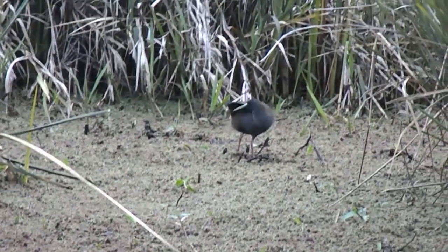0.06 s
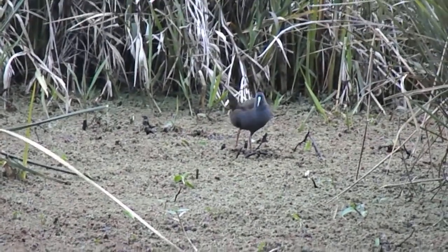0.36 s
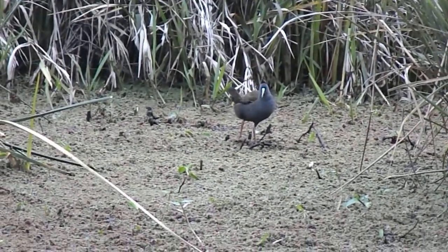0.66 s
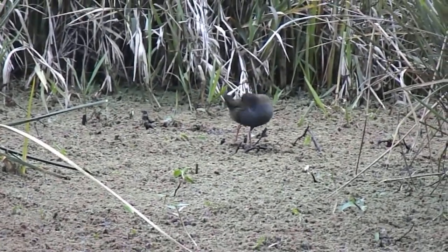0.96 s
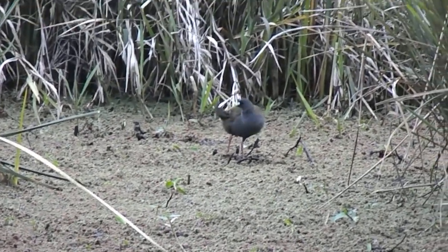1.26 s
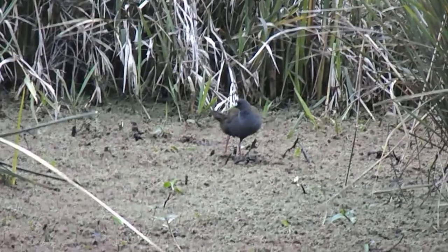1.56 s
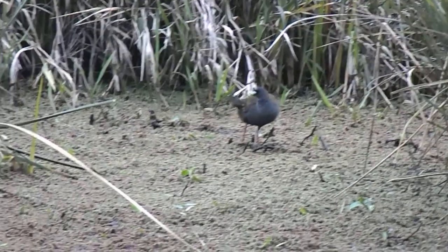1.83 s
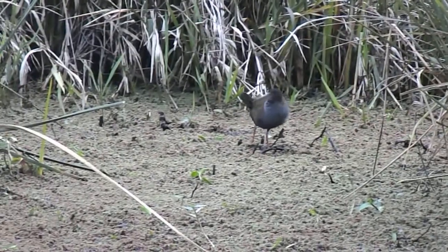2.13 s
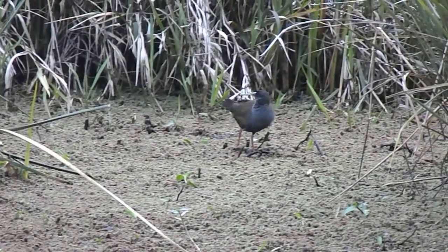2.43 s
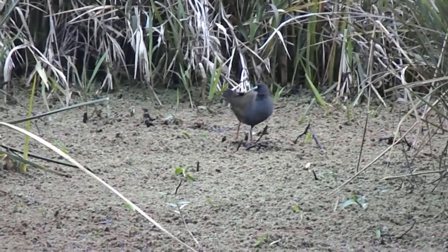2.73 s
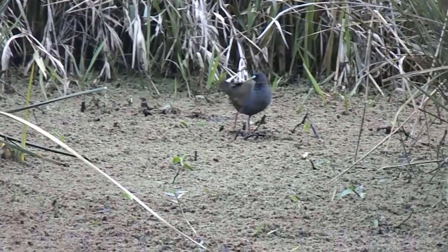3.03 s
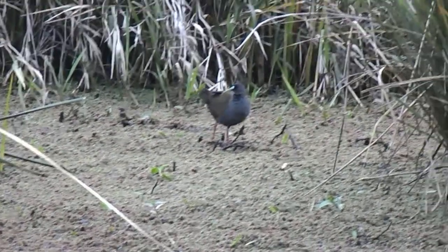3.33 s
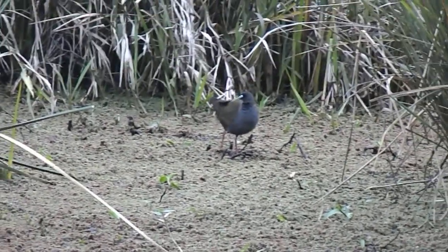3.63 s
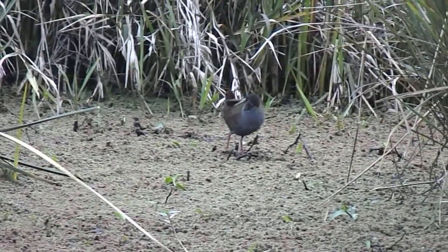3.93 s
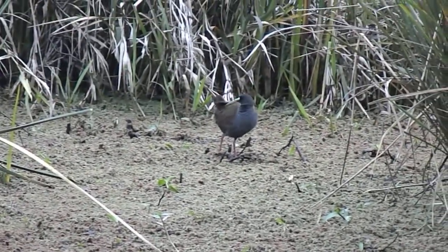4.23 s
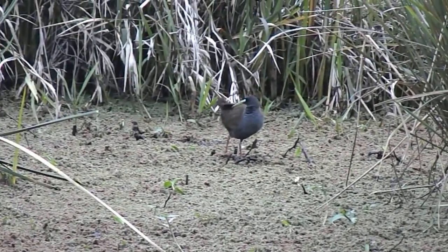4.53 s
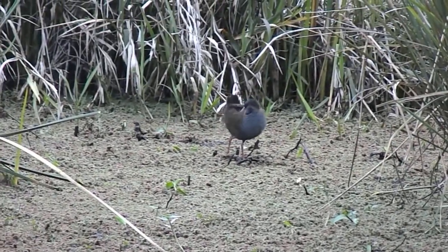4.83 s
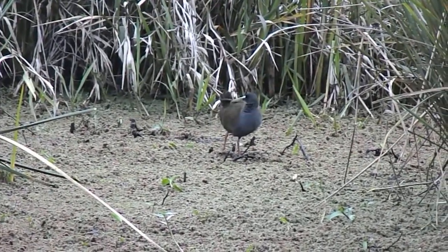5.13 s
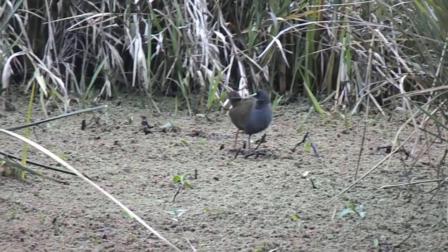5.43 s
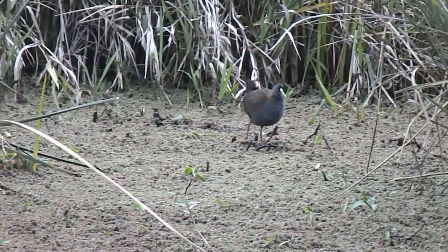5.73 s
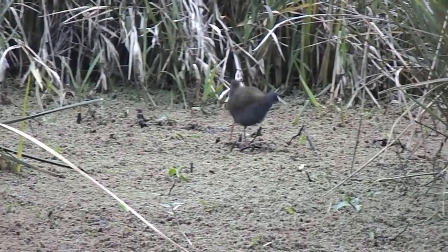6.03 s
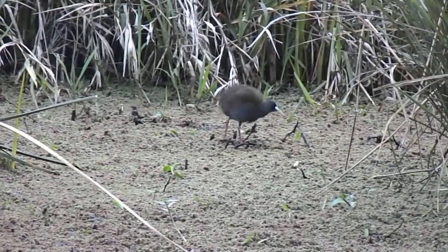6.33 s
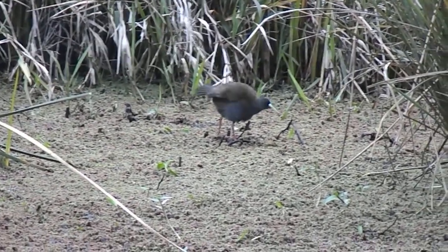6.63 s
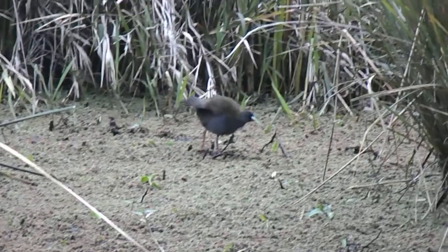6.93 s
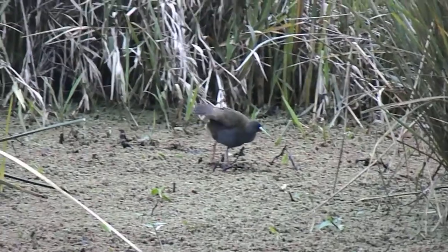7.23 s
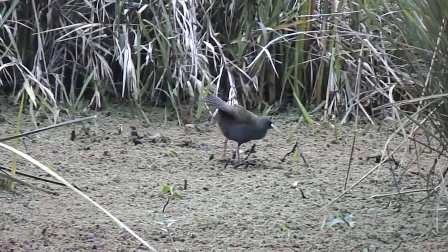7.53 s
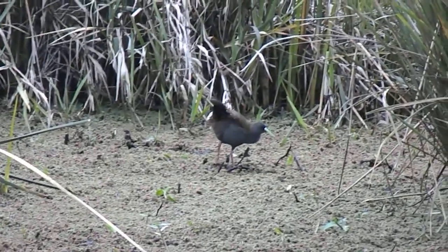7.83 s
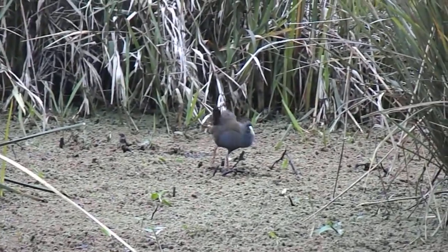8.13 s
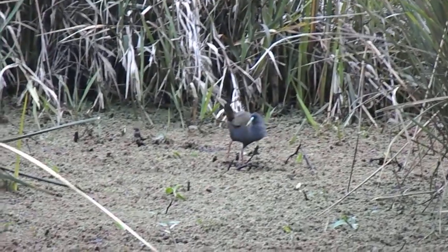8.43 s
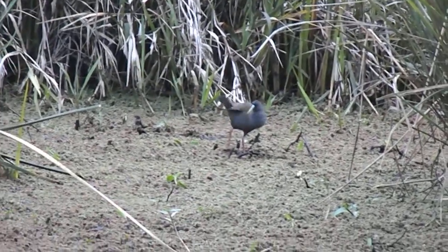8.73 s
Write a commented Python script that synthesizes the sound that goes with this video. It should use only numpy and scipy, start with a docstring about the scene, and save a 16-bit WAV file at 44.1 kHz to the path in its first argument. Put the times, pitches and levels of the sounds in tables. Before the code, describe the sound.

A marsh bird chirps again and again, high, thin and raspy, over pulsing crickets and a faint steady high whine.

```python
"""Marsh bird at the reed bed

A bird chirps again and again, drifting from left to centre: each call is a short rising rasp that
breaks into a thin falling whistle. Three crickets pulse, dry stalks scratch now and then, and fainter
birds answer, all echoing in the reeds. Under them lie a wash of open air and, mostly on the right,
a camera's soft motor hum and thin high whine."""
import sys
import numpy as np
from scipy import signal
from scipy.fft import rfft, irfft
from scipy.io import wavfile

SR = 44100
rng = np.random.default_rng(int(sys.argv[2]) if len(sys.argv) > 2 else 0)


def persist_wave(psi):
    """Save psi, clipped to +-1, as 16-bit WAV."""
    counts = np.round(np.clip(psi, -1, 1) * 32767).astype(np.int16)
    wavfile.write(sys.argv[1], SR, np.atleast_2d(counts).T)


N = 392049
TIME = np.arange(N) / SR


def amp(db):
    """Decibels to gain."""
    return 10 ** (np.asarray(db) / 20)


def unit_rms(x):
    """Scales to rms 1."""
    return x / np.sqrt(np.mean(x ** 2) + 1e-20)


def curve_at(points, hz):
    """Reads a curve on a log-frequency axis."""
    f, value = np.transpose(points)
    return np.interp(np.log(hz + 1), np.log(f + 1), value)


def add(mix, s, sound):
    """Lays a sound into the mix from time s on."""
    start = round(s * SR)
    sound = sound[..., max(-start, 0):]
    part = mix[..., max(start, 0):][..., :sound.shape[-1]]
    part += sound[..., :part.shape[-1]]


def wander(hz):
    """Smooth random modulation of rms 1, rolling off around hz."""
    f = np.fft.rfftfreq(N, 1 / SR)
    return unit_rms(irfft(rfft(rng.standard_normal(N)) * np.exp(-(f / hz) ** 2), N))


def pan(db):
    """Stereo gains that put the left db above the right."""
    return amp(np.array([[db], [-db]]) / 2)


def delayed(x, ms):
    """Delays by any fraction of a sample."""
    hz = np.fft.rfftfreq(len(x), 1 / SR)
    return irfft(rfft(x) * np.exp(-2j * np.pi * hz * ms / 1000), len(x))


def rasp(db, octave_db, hiss_db, pitch_factor, motion, length=.037, low_hz=1930, high_hz=2720):
    """The voice climbs, shaken hoarse by a second, slower vibration. Returns (offset [s], sound)."""
    rough_ratio = 720 / low_hz  # the slower vibration's rate against the voice's
    u = np.arange(0, 1, 1 / (length * SR))
    jitter, shake = motion[:, :len(u)]
    climb_hz = low_hz + (high_hz - low_hz) * np.sin(np.pi / 2 * u) ** 2
    hz = pitch_factor * climb_hz * (1 + .028 * jitter) * (1 + .04 * shake[0])
    phase = 2 * np.pi * np.cumsum(hz) / SR
    roughness = .85 * (np.sin(phase * rough_ratio) / 2 + np.tanh(2 * shake))
    body = (amp(-12) * np.sin(phase) + amp(octave_db) * np.sin(2 * phase)) * (1 + .7 * roughness)
    upper = sum(amp(h) * np.sin(k * phase + k * k) for k, h in enumerate([-7.5, -12.5, -20, -20], 3))
    swell = np.interp(u, [0, .25, .72, 1], [.15, .68, .73, .095])
    hiss = unit_rms(upper * (.5 + roughness) * swell)
    return -length, np.sqrt(2) * amp(db) * body * unit_rms(swell) + amp(hiss_db) * hiss


def whistle(length, top_hz, end_hz, hold, level_db, overtone_db, motion):
    """A near sine flicks up, holds and sags, coloured by throat and beak. Returns (offset [s], sound)."""
    # what the throat passes of the whistle: (pitch [Hz], gain [dB])
    throat = [(3000, -0.5), (3500, -1), (4000, 2.15), (4500, -0.1), (5000, -4.5), (5500, -9), (6000, -7.5),
              (6600, -1.5)]
    # what the beak passes of the overtones: (frequency [Hz], gain [dB])
    beak = [(6200, 2.5), (7200, 0.5), (9000, -1), (10200, -10.5), (12000, -8), (13500, -19), (16000, -23)]
    flick_s, flick_depth, knee, release_s = .006, .2246, .041, .011
    t = np.arange(-flick_s, length + release_s / 2, 1 / SR)
    u = np.clip(t / length, 0, 1)
    drift, flutter = motion[:, :len(t)]
    sag = np.clip(knee * np.logaddexp(0, (u - hold) / knee) / (1 - hold), 0, 1)
    hz = end_hz + (top_hz - end_hz) * (1 - sag) ** 2.05  # falls ever more slowly
    hz *= (1 - flick_depth * (np.minimum(t, 0) / flick_s) ** 2) * (1 + .01014 * drift)
    phase = 2 * np.pi * np.cumsum(hz) / SR
    overtones = sum(amp(overtone_db + db + curve_at(beak, k * hz)) * np.sin(k * phase)
                    for k, db in enumerate([0, -4, -1], 2))
    fades = np.clip((t + flick_s) / flick_s, 0, 1) * np.clip((t[-1] - t) / release_s, 0, 1)
    envelope = np.sqrt(2) * fades * amp(level_db + .2 * u - 4 * u ** 4 + 1.5 * flutter)
    return -flick_s, envelope * amp(curve_at(throat, hz)) * (np.sin(phase) + overtones)


def near_bird(usual_db=-38, usual_end_hz=3347):
    """The lead voice: rasp, then whistle, each call from the spot the bird has reached."""
    # calls: (whistle start [s], length [s], top pitch [Hz], end pitch [Hz], hold [share of length],
    # level before the throat [dB], overtones before the beak [relative dB], base rasp hiss [dB])
    calls = [(0.0, 0.052, 5350, 3370, 0.0007, -44, -14.5, -64),
             (0.189, 0.1, 6800, 3410, 0.17, -50.5, -6, -67),
             (0.288, 0.062, 5480, 3480.0, 0.071, -38.5, -15.5, -61),
             (0.508, 0.07, 5310, 3280.0, 0, -41.5, -16.5, -66),
             (0.787, 0.073, 6060.0, 3340, 0.1, -42, -14, -51.5),
             (1.211, 0.09, 6620, 3600.0, 0.17, -46.0, -8, -61),
             (1.538, 0.065, 5550, 3440, 0.038, -37, -9.5, -48),
             (1.71, 0.07, 5050, 3380, 0.071, -44, -12, -51),
             (1.776, 0.072, 5720, 3350, 0.016, -39.0, -13, -50.5),
             (1.994, 0.069, 5080, 3424, 0.01, -42.5, -14, -51),
             (2.083, 0.088, 6680, 3390, 0.18, -41.5, -9, -54),
             (2.375, 0.078, 3800.0, 3370.0, 0.03, -66, -22.0, -75),
             (2.617, 0.069, 6440.0, 3490, 0.065, -38.5, -6.5, -44.5),
             (2.876, 0.089, 6700, 3445, 0.21, -43, -6.5, -57),
             (2.987, 0.064, 5530, 3370, 0.073, -38.5, -11.5, -56),
             (3.229, 0.058, 5400, 3314, 0.03, -38.5, -14.5, -55),
             (3.548, 0.098, 6610, 3510, 0.1, -40.5, -8, -58.5),
             (3.621, 0.077, 6430, 3380, 0.12, -40.5, -15.0, -54),
             (4.164, 0.086, 6440.0, 3195, 0.22, -41.0, -8.5, -57),
             (4.223, 0.079, 5170, 3190, 0.02, -45.0, -13.0, -60),
             (4.317, 0.061, 5720, 3365, 0.077, -39, -17, -52.5),
             (4.665, 0.07, 5220, 3385, 0.078, -38.5, -13.0, -53.5),
             (4.897, 0.094, 6450.0, 3300.0, 0.11, -41, -11.0, -56.5),
             (5.027, 0.073, 4740, 3080, 0.11, -42, -18, -53),
             (5.292, 0.063, 5250, 3310.0, 0.02, -39.0, -9.5, -50.5),
             (5.324, 0.074, 5700.0, 3350.0, 0.0031, -43.5, -19.0, -57),
             (5.47, 0.095, 6350, 3390, 0.034, -44.5, -14, -68),
             (5.835, 0.081, 5950.0, 3284, 0.16, -40.5, -14.0, -52.5),
             (6.328, 0.079, 4740, 3195, 0.098, -46, -13.5, -63),
             (7.06, 0.084, 4690.0, 3245, 0.051, -45.0, -19, -58),
             (7.179, 0.063, 4910, 3200, 0.047, -46, -17.0, -62),
             (7.304, 0.058, 5760, 3460.0, 0.019, -55.5, -9, -67),
             (7.338, 0.09, 5400.0, 3290, 0.051, -51, -17, -60),
             (7.489, 0.045, 5840, 3460, 0.0078, -58, -15, -66),
             (7.583, 0.1, 6260, 3190, 0.21, -50, -13.0, -65),
             (8.006, 0.073, 5120, 3246, 0.0, -50.5, -15, -74),
             (8.224, 0.09, 4690, 3090, 0.13, -49, -17, -57.5),
             (8.505, 0.086, 6360, 3440, 0.041, -45.5, -18.0, -59),
             (8.641, 0.059, 4330, 3150, 0.13, -54, -18, -74),
             (8.677, 0.11, 6560, 3184, 0.073, -49.5, -16, -70)]
    # the bird's path: (time [s], right channel's lag [ms], left over right [dB])
    path = [(0, 0.11, 7), (2, 0.1, 5.5), (4.2, 0.082, 6), (5.4, 0.059, 4), (6.2, 0.031, 8.5),
            (8.6, -0.027, 1.5)]
    times, lags, sides = np.transpose(path)
    out = np.zeros((2, N))
    slow, fast = np.array([wander(170), wander(130)]), np.array([wander(1100), wander(986)])
    for call, detune in zip(calls, rng.standard_normal(len(calls))):
        s, length, top_hz, end_hz, hold, level_db, overtone_db, hiss_db = call
        at = int(s * SR / 2)  # where this call picks up the modulation
        lag_ms, gains = np.interp(s, times, lags), pan(np.interp(s, times, sides))
        rasp_db = -44.5 + .7 * (level_db - usual_db)  # louder calls rasp harder
        # the rasp's octave weakens before a high whistle: (top pitch [Hz], gain [dB])
        rasp_octave = [(5700, 0), (6400, -7)]
        pitch_factor = end_hz / usual_end_hz + .0299 * detune
        onset = rasp(rasp_db, curve_at(rasp_octave, top_hz), hiss_db + .7, pitch_factor, fast[:, at:])
        tone = whistle(length, top_hz, end_hz, hold, level_db, overtone_db, slow[:, at:])
        for offset, sound in (onset, tone):
            add(out, s + offset, gains * np.array([sound, delayed(sound, lag_ms)]))
    return out


def crickets(third_per_s=12.15):
    """Each wing stroke is a tone that sags; two crickets take turns, a third keeps a faster beat."""
    # the leading cricket's beat: (time [s], running count [strokes])
    stroke_counts = [(0, -.42), (1, 9.8), (2, 20.16), (4, 40.74), (5, 51.0), (6, 61.22), (7, 71.63),
                     (8.9, 91.2)]
    # crickets: (pitch [Hz], fall [Hz], stroke [share of beat], level [dB], second partial [dB],
    # third partial [dB], left over right [dB], late level change [dB])
    voices = [(3780, 170, .56, -55.5, -4, -7, -1, -2), (3925, 170, .5, -52.8, -21, -22, 0, -9),
              (4540, 110, .5, -65, -22, -28, 2, 0)]
    # the span over which the pair quietens: (start [s], end [s])
    quieten_s = [6.57, 7.7]
    lead_beat = np.interp(TIME, *np.transpose(stroke_counts))
    beats = lead_beat, lead_beat - .55, (TIME - 6.48) * third_per_s
    late = np.interp(TIME, quieten_s, [0, 1])
    out = np.zeros((2, N))
    for (hz, fall_hz, share, db, second_db, third_db, side_db, late_db), beat in zip(voices, beats):
        u = np.clip(((beat + .5) % 1 - .5) / share + .5, 0, 1)  # progress through the stroke
        arch = np.sin(np.pi * u)
        phase = 2 * np.pi * np.cumsum(hz - fall_hz * u ** 2 + 10 * wander(38.6)) / SR
        stroke = arch * amp(db + late_db * late + 1.5 * wander(4.5))
        overtones = amp(second_db) * np.sin(2 * phase) + amp(third_db) * np.sin(3 * phase)
        out += np.sqrt(2) * stroke * (pan(side_db) * np.sin(phase) + pan(2.6) * arch * overtones)
    return np.array([out[0], delayed(out[1], .035)])


def marsh_air(swell_db=.61):
    """A wide, gently breathing bed of noise, its treble a little to the left."""
    # open air with a far insect chorus near 4 kHz: (frequency [Hz], density [dB per Hz])
    spectrum = [(20, -122), (65, -140), (120, -120), (200, -107), (330, -95.5), (550, -94), (2700, -93),
                (3400, -86.5), (3850, -81.5), (4500, -90), (5200, -96.5), (8200, -97), (12500, -102.5),
                (15700, -103.5)]
    # how alike the air is on both sides: (frequency [Hz], correlation [-1 to 1])
    correlation = [(100, -0.11), (600, 0.11), (1500, 0.12), (3500, -0.52), (7000, -0.13), (12000, 0.0091)]
    hz = np.fft.rfftfreq(N, 1 / SR)
    left, other = rfft(rng.standard_normal((2, N)))
    same = curve_at(correlation, hz)
    right = same * left + np.sqrt(1 - same ** 2) * other
    side_db = curve_at([(300, -2.5), (2500, .5), (4500, 2.5), (8000, .5)], hz)
    stereo = np.array([left * amp(side_db / 2), right * amp(-side_db / 2)])
    wash = irfft(stereo * amp(curve_at(spectrum, hz)), N) * np.sqrt(SR / 2)
    return wash * amp(swell_db * wander(1.0))


def camera_motor(whine_hz=11721, low_cut_hz=330):
    """Motor noise through the housing's resonances, and a thin electronic whine."""
    # resonances of the housing: (centre [Hz], width [Hz], peak density [dB per Hz])
    housing = [(420, 150, -99), (630, 325, -92.5), (945.5, 83.5, -79.5), (1101, 88, -86), (1282, 104, -87),
               (1555, 360, -93), (1818, 120, -85.5), (10500, 880, -100)]
    hz = np.fft.rfftfreq(N, 1 / SR)
    power = sum(amp(db) ** 2 / (1 + ((hz - f) / width) ** 2 * 2) ** 2 for f, width, db in housing)
    power *= 1 - np.exp(-(hz / low_cut_hz) ** 6)
    hum = irfft(rfft(rng.standard_normal(N)) * np.sqrt(power * SR / 2), N)
    whine = np.sqrt(2) * np.sin(2 * np.pi * whine_hz * TIME)
    return amp([[-13], [0]]) * hum + amp([[-83], [-71.5]]) * whine


def reed_echo(send, early_db=10, early_t60=.075, echoes_per_s=3000):
    """Stalks scatter the sound: a quick cluster of echoes and a longer faint tail."""
    # decay of the tail: (frequency [Hz], t60 [s])
    tail_t60 = [(2000, 0.17), (4000, 0.24), (8000, 0.58), (14000, 0.092)]
    taps = rng.standard_normal((2, SR // 2)) * (rng.random((2, SR // 2)) < echoes_per_s / SR)
    taps[:, :int(.002 * SR)] = 0  # pre-delay
    hz, t, bands = signal.stft(taps, SR, nperseg=256)
    decay = amp(-60 * t / curve_at(tail_t60, hz)[:, None]) + amp(early_db - 60 * t / early_t60)
    impulse = signal.istft(bands * decay, SR, nperseg=256)[1]
    impulse /= np.linalg.norm(impulse, axis=1, keepdims=True)
    return signal.fftconvolve(send, impulse, axes=1)[:, :N]


def stalk_scratches(width_octaves=.48, graininess=.76):
    """Dry stalks scratch on the left in short grainy bursts of noise."""
    # scratches: (time [s], length [s], centre [Hz], level [dB])
    bursts = [(0.418, 0.028, 4080, -56), (1.416, 0.022, 6500, -57), (2.527, 0.014, 5500, -59),
              (3.454, 0.021, 5300, -56.5), (4.785, 0.043, 3780, -62), (6.0, 0.031, 6800, -60.5),
              (6.374, 0.038, 6660, -57.5), (6.955, 0.022, 3700, -53.5)]
    out, hz = np.zeros(N), np.fft.rfftfreq(4096, 1 / SR) + 1
    for s, length, centre_hz, db in bursts:
        noise, grit = rng.standard_normal((2, 4096))
        band = np.exp(-.5 * (np.log2(hz / centre_hz) / width_octaves) ** 2)
        grains = irfft(rfft(noise * np.exp(graininess * grit)) * band)[:int(length * SR)]
        add(out, s, amp(db) * unit_rms(grains * signal.windows.tukey(len(grains), .7)))
    return pan(6.5) * out


def far_birds(count=20, level_db=-58.5, rasp_db=-67, hiss_db=-69):
    """Fainter, quicker calls from the reeds on the left, and a few peeps of almost even pitch."""
    # distant peeps: (time [s], length [s], pitch [Hz], level before the throat [dB])
    peeps = [(.56, .035, 5500, -54), (3.954, 0.039, 4950, -54), (6.535, .03, 4940, -56),
             (7.152, 0.035, 4800, -45.5), (8.069, 0.044, 4940, -54), (8.145, 0.013, 6920, -55),
             (8.33, 0.038, 4740, -53), (8.817, 0.039, 5000, -53.5)]
    out = np.zeros(N)
    slow, fast = np.array([wander(170), wander(140)]), np.array([wander(1200), wander(980)])
    for when, stretch, lift in rng.random((count, 3)):
        s = TIME[-1] * when ** .6  # calls grow likelier as time goes on
        at = int(when * N / 2)
        top_hz, end_hz = np.array([5400, 3000]) * (1 + .1 * lift)
        onset = rasp(rasp_db, 0, hiss_db, 1, fast[:, at:])
        tone = whistle(.044 + .03 * stretch, top_hz, end_hz, 0, level_db, -24, slow[:, at:])
        for offset, sound in (onset, tone):
            add(out, s + offset, sound)
    for s, length, hz, db in peeps:
        _, peep = whistle(length, hz * 1.02, hz * .99, 0, db, -20, slow[:, int(s * SR / 2):])
        add(out, s, peep)
    return pan(8.7) * np.array([out, delayed(out, .11)])


def scene():
    """Birds, stalks and crickets with their echo in the reeds, over the air and the motor hum."""
    near, far, insects = near_bird() + stalk_scratches(), far_birds(), crickets()
    low_cut = signal.butter(2, 1200, "highpass", fs=SR, output="sos")  # a small beak radiates no bass
    near = signal.sosfilt(low_cut, near)
    send = amp(-11.5) * near + amp(-5.5) * far + amp(-7) * insects
    return near + far + insects + reed_echo(send) + marsh_air() + camera_motor()


def record(dry):
    """A steep low-pass takes off the very top of the mix."""
    edge_hz = 15780
    low_pass = signal.firwin(1023, edge_hz, window=("kaiser", 8), fs=SR)
    return signal.oaconvolve(dry, low_pass[None], "same")


dry = scene()
out = record(dry)
persist_wave(out)
```